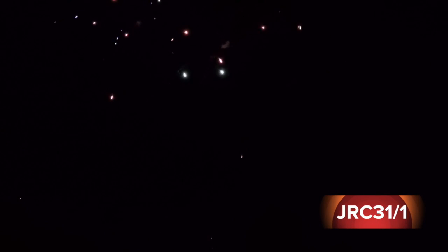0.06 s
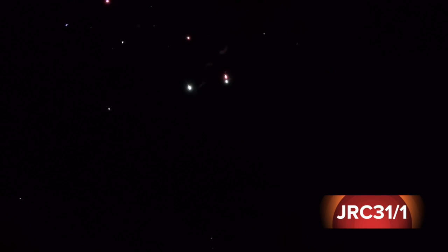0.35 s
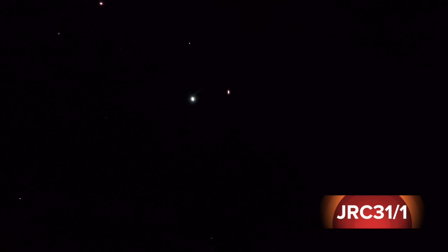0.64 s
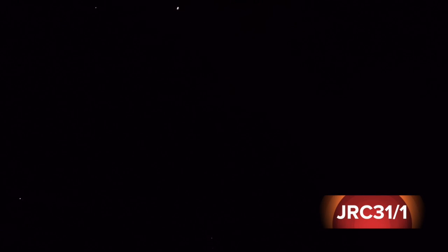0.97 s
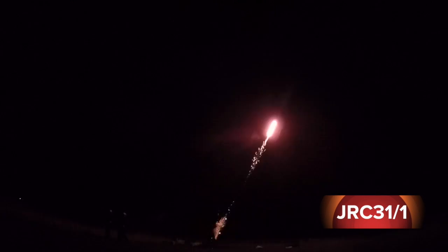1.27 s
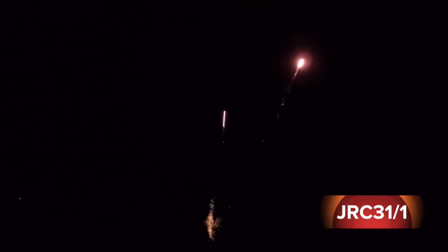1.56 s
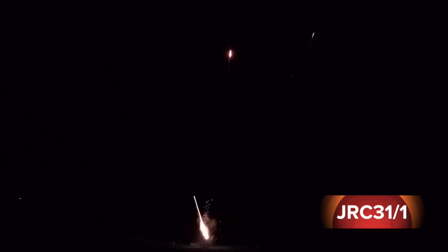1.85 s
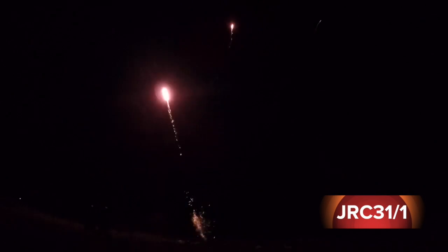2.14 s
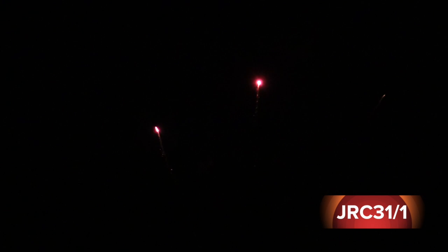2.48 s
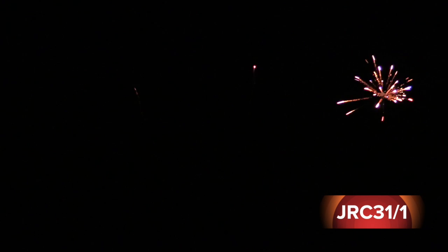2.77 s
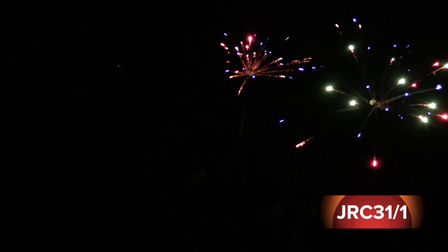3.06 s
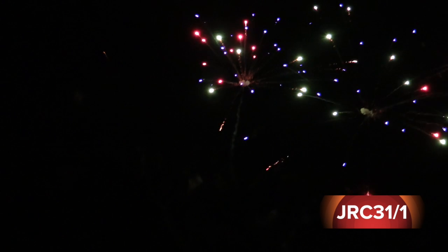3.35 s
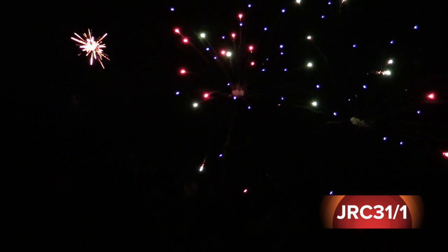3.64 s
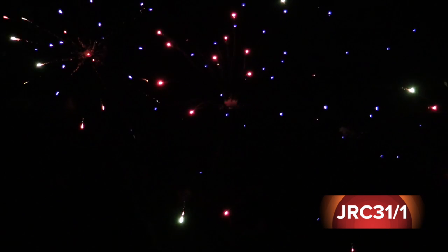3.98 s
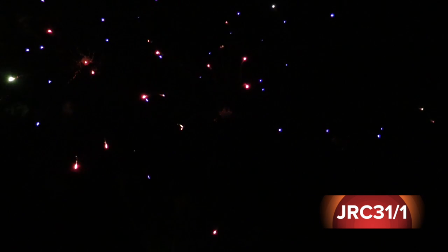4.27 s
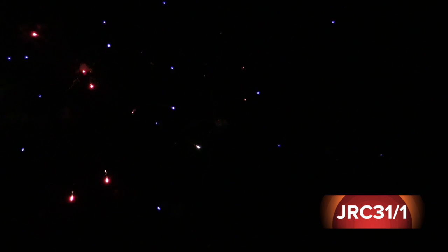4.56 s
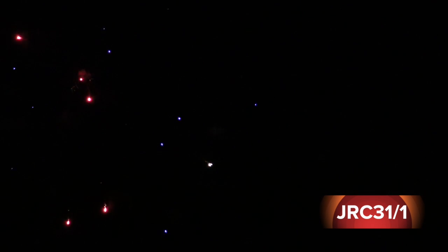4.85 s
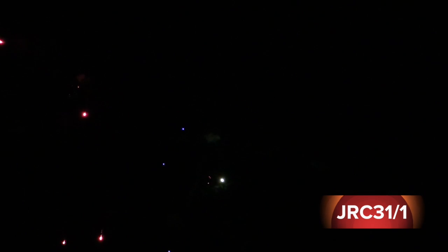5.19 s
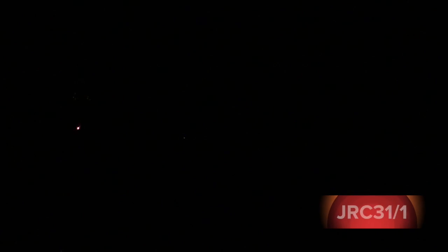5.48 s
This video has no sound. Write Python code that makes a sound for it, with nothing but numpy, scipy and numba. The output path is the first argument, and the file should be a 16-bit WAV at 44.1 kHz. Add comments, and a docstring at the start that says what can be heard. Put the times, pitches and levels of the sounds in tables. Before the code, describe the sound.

Fireworks at night: three thumping launches, then three loud bangs overhead that roll away in a fading, crackling rumble.

```python
"""A firework cake at night. First an earlier burst's rumble and crackle die away over the hiss of the
open air, with a few faint thuds and snaps. From 1.2 s three shells thump out of their tubes; walls slap
the sound back and trees crackle with echoes. From 3 s the shells burst overhead, overloading the
microphone. Last, their long rumble rolls round the land and fades, the air soaking up the treble."""
import sys
import numpy as np
from scipy import signal
from scipy.fft import rfft, irfft, next_fast_len
from scipy.io import wavfile
from scipy.ndimage import uniform_filter1d, map_coordinates
from numba import njit

SR = 44100
rng = np.random.default_rng(int(sys.argv[2]) if len(sys.argv) > 2 else 0)


def store_pcm(level_fs):
    """Save levels as 16-bit WAV."""
    pcm = np.round(np.clip(level_fs, -1, 1) * 32767).astype(np.int16)
    wavfile.write(sys.argv[1], SR, np.atleast_2d(pcm).T)


N = 247842
T = np.arange(N) / SR


def amp(db):
    """Turn decibels into a gain."""
    return 10 ** (np.asarray(db) / 20)


def add(track, s, sound):
    """Mix a sound into the track, starting at s seconds."""
    i = max(round(s * SR), 0)
    track[i:i + len(sound)] += sound[:max(N - i, 0)]


def filtered(x, response):
    """Turn each frequency of x up or down by response(hz)."""
    size = next_fast_len(N + 8192)
    return irfft(rfft(x, size) * response(np.fft.rfftfreq(size, 1 / SR)), size)[:N]


def coloured(x, spectrum, band=lambda hz: 1):
    """Give x the tone of a spectrum table, within a band, at an average (rms) level of 1."""
    f, db = np.transpose(spectrum)
    x = filtered(x, lambda hz: amp(np.interp(np.log(hz + 1), np.log(f), db)) * band(hz))
    return x / np.sqrt(np.mean(x ** 2) + 1e-20)


def bass(hz):
    """The long waves, below 600 Hz, that whole walls and slopes send back."""
    return 1 / np.sqrt(1 + (hz / 600) ** 8)


def treble(hz):
    """The short waves that twigs and rough ground send back."""
    return np.sqrt(1 - bass(hz) ** 2)


def steadied(x, span_s):
    """Even out x so that every stretch of span_s is equally loud."""
    return x / np.sqrt(np.abs(uniform_filter1d(x ** 2, int(span_s * SR))) + 1e-6)


def wobble(rate):
    """A smooth curve through random points, rate of them a second."""
    return map_coordinates(rng.standard_normal(int(N * rate / SR) + 4), [np.arange(N) * rate / SR])


def fading(age, db_per_s):
    """Full level until age 0, then a steady fall."""
    return amp(-db_per_s * np.maximum(age, 0))


def swelling(rows):
    """A gain with one smooth hump or dip for each row."""
    return amp(sum(db * np.exp(-.5 * ((T - s) / spread) ** 2) for s, spread, db in rows))


def echo_level(age, rise_s, hold_s, fall_db_per_s, far_db, far_db_per_s):
    """Echoes build up, hold while the near land answers, then leave the far hills' slow tail."""
    near = fading(age - hold_s, fall_db_per_s)
    far = amp(far_db) * fading(age - hold_s, far_db_per_s)
    return np.clip(age / rise_s, 0, 1) * np.hypot(near, far)


def rumbling(spectrum, lumps_db, rate):
    """Deep noise that comes in lumps, rate a second."""
    noise = coloured(rng.standard_normal(N), spectrum, bass)
    return steadied(noise, span_s=.12) * amp(lumps_db * wobble(rate))


def reflections(rate, clump_db):
    """Countless small echoes of random size, rate a second, arriving in clumps."""
    arrivals = rng.random(N) < rate / SR
    return arrivals * rng.standard_normal(N) * amp(clump_db * wobble(130))


def through_air(x, age, db_per_s, power):
    """Air takes db_per_s from an echo at 1 kHz, and more from the treble; an age below 0 brightens."""
    hz, t, spectra = signal.stft(x, SR, nperseg=256)
    loss_db = db_per_s * (hz[:, None] / 1000) ** power * np.interp(t, T, age)
    return signal.istft(spectra * amp(-loss_db), SR, nperseg=256)[1][:N]


def slaps(rows, rough, smear_s):
    """Short pulses, each in its own band of frequencies; rough surfaces smear their treble."""
    out, t = np.zeros(N), np.arange(SR // 10) / SR
    highpass = signal.butter(2, 1000, "high", fs=SR, output="sos")
    for s, db, hz, octaves in rows:
        edges = np.clip(hz * 2 ** (np.array([-.5, .5]) * octaves), 20, SR / 2 - 100)
        band = signal.butter(3, edges, "band", fs=SR, output="sos")
        pulse = signal.sosfilt(band, signal.unit_impulse(len(t)))
        smear = signal.sosfilt(highpass, rng.standard_normal(len(t)) * np.exp(-t / smear_s))
        smear = signal.sosfilt(band, smear / np.linalg.norm(smear))
        add(out, s, amp(db) * (pulse + rough * smear) / np.abs(pulse).max())
    return out


def blast(push_s, low_hz, front_hz, order):
    """A sudden push of air, then suction; the air rounds it and the microphone's bass cut rings."""
    u = np.arange(SR // 20) / SR / push_s
    shock = (1 - u) * np.exp(-u)
    air = signal.butter(1, front_hz, fs=SR, output="sos")
    microphone = signal.butter(order, low_hz, "high", fs=SR, output="sos")
    return -signal.sosfilt(microphone, signal.sosfilt(air, shock))


# the rumble's tone at first (off small things close by), at full depth, and from far hills: f/Hz, level/dB
EARLY_RUMBLE = [(25, -40), (80, -26), (150, -13), (240, -2), (330, 0), (440, -6), (600, -13), (900, -13)]
DEEP_RUMBLE = [(25, -36), (55, -41), (100, -13.5), (150, -4), (210, -1), (280, 1), (340, -3.5), (420, -9.5),
               (520, -18.5), (900, -13)]
FAR_RUMBLE = [(25, -48), (60, -30), (100, -10), (150, -1), (210, 1), (280, -2), (400, -9), (520, -14),
              (900, -18)]


def burst_rumble(age, hold_s, deepen_s=.27, far_db=-23.2):
    """A burst's low echoes deepen and die away, leaving a long tail from the far hills."""
    depth = np.clip(age / deepen_s, 0, 1) ** 2
    near = np.sqrt(1 - depth) * rumbling(EARLY_RUMBLE, lumps_db=.8, rate=35)
    near += np.sqrt(depth) * rumbling(DEEP_RUMBLE, lumps_db=.8, rate=35)
    near *= np.clip(age / .065, 0, 1) * fading(age - hold_s, db_per_s=63)
    far = amp(far_db) * rumbling(FAR_RUMBLE, lumps_db=1.6, rate=25)
    far *= np.clip(age / hold_s, 0, 1) * fading(age - hold_s, db_per_s=6.5)
    return near + far


# the tone of a burst's crackle: f/Hz, level/dB
BURST_CRACKLE = [(260, -41), (450, 1), (625, -14), (882, -8.5), (1070, -11), (1220, -12.5), (1440, -11),
                 (2330, -13.5), (4230, -18.5), (6060, -27), (7470, -29), (12400, -49), (16000, -57)]
# swells and lulls as the sound sweeps over nearby trees and clearings: t/s, spread/s, level/dB
SWELLS = [(3.1, .027, 6), (3.258, .018, 5), (3.992, .009, 9), (4.028, .006, 6.5), (4.058, .012, -4),
          (4.123, .022, 5.5), (4.215, .014, -4)]


def burst_crackle(age, hold_s, patchy_db=.7):
    """Tiny echoes off twigs and rough ground; later ones have crossed more air and sound duller."""
    crackle = coloured(reflections(rate=9000, clump_db=1.0), BURST_CRACKLE, treble)
    crackle = through_air(crackle, np.clip(age - .19, -.06, .7), db_per_s=.45, power=2.03)
    level = echo_level(age, rise_s=.01, hold_s=hold_s, fall_db_per_s=41, far_db=-23.5, far_db_per_s=7)
    return steadied(crackle, span_s=.052) * level * amp(patchy_db * wobble(35)) * swelling(SWELLS)


# shells bursting in the sky, the first before the start:
# t/s, blast level/dB, rumble level/dB, crackle level/dB, echo hold/s
BURSTS = [(-.83, 30, -7, -19, .44), (2.966, 30.5, -10.3, -20.2, .44), (3.1352, 31.5, -10.3, -19.6, .42),
          (3.9302, 33, -8.8, -20.8, .41)]


def rolls():
    """Every burst rolls round the land as a low rumble and a high crackle."""
    out = np.zeros(N)
    for s, _, rumble_db, crackle_db, hold_s in BURSTS:
        out += amp(rumble_db) * burst_rumble(T - s, hold_s)
        out += amp(crackle_db) * burst_crackle(T - s, hold_s)
    return out


# the tone of the night air: f/Hz, level/dB
NIGHT_HISS = [(30, -8), (90, 16.5), (220, -9.5), (500, 0.5), (1500, 0.5), (2500, -29), (3300, -7.5),
              (5000, -11.5), (7500, -15.5), (10000, -21.5), (13000, -26.5), (16000, -37)]


def night(air_db=-51, stars_db=-26.5, spread_s=.85):
    """The open air hisses faintly, and more as each burst's burning stars spread, until they fade."""
    power = amp(air_db) ** 2
    for s, _, _, crackle_db, _ in BURSTS:
        stars = np.clip((T - s) / spread_s, 0, 1) * fading(T - s - spread_s, db_per_s=12)
        power = power + (amp(crackle_db + stars_db) * stars) ** 2
    return np.sqrt(power) * coloured(rng.standard_normal(N), NIGHT_HISS)


# single echoes of the bursts: t/s, level/dB, f/Hz, width/octaves
THUDS = [(.048, -18, 190, 1.2), (.598, -25, 190, 1.2), (3.038, -4, 300, 1.2), (3.124, -2, 260, 1.3),
         (3.558, -4, 244, 1.2), (3.662, -8, 230, 1.2), (3.9895, 2, 1300, 3), (4.037, 0, 280, 1.2),
         (4.258, -6, 1100, 1.6), (4.362, -3.5, 400, 3), (4.521, -2, 230, 1.2), (4.812, -17, 260, 1.5),
         (4.842, -19, 222, 1.5), (5.406, -24, 220, 1.2)]


def thuds():
    """Far walls and slopes each send a burst back as one thud or slap."""
    return slaps(THUDS, rough=.4, smear_s=.0015)


# small sounds before the launches: t/s, level/dB, f/Hz, width/octaves
SNAPS = [(.3988, -14.5, 2800, 4), (.533, -39, 4350, .4), (.569, -33, 4300, .6), (.6045, -33, 4100, .7),
         (1.084, -31, 910, 1), (1.2115, -33, 1580, 0.64)]


def snaps():
    """Small snaps and far pops, one short pulse each."""
    return slaps(SNAPS, rough=.5, smear_s=.002)


# shells leaving their tubes: t/s, level/dB
LAUNCHES = [(1.242, 12), (1.539, 13.5), (2.019, 12)]
# echoes after each launch: t/s, level/dB, f/Hz, width/octaves
LAUNCH_ECHOES = [(.0003, 8.5, 2150, 1.35), (.0036, 0, 2220, 1.1), (.004, -13, 7400, .5),
                 (.0104, -15, 2400, 1.7), (.0187, 4, 2900, 1.4), (.0202, -7, 2600, 1.1),
                 (.021, -12.5, 380, 1.5), (.06, -11.5, 295, 1.05), (.07, -14, 330, 1.8),
                 (.0845, -4, 262, 1.17), (.133, -12, 1940, 1.05), (.1735, -9.5, 1800, .8),
                 (.2355, -15, 3040, 1.06), (.244, -17.5, 1600, .76), (.36, -21, 213, .6)]
# the tone of a launch's rumble and of its crackle: f/Hz, level/dB
LAUNCH_RUMBLE = [(15, -72), (25, -46), (64, -37), (78, -33), (91, -13), (204, 2), (350, -2.5), (502, -22),
                 (549, -13), (900, -36), (1170, -49), (1980, -120)]
LAUNCH_CRACKLE = [(260, -30), (450, 3.5), (546, -13), (598, -8.5), (705, -13), (964, -15), (1630, -9),
                  (1950, -11), (2470, -12.5), (4050, -17), (5460, -22.5), (7360, -27), (10200, -38),
                  (16000, -56)]
# groups of trees that throw the crackle back after each launch: t/s, spread/s, level/dB
GROVES = [(.052, .012, 3), (.137, .016, 5), (.24, .012, 1.5), (.375, .022, 6.5), (.49, .035, 5.5)]


def launches(rumble_db=-20.3, crackle_db=-25.7):
    """Each shell thumps out; the tubes stand together, so all share one rumble but the crackle varies."""
    rumble = steadied(coloured(rng.standard_normal(N), LAUNCH_RUMBLE, bass), span_s=.04)
    rumble *= echo_level(T, rise_s=.045, hold_s=.075, fall_db_per_s=42, far_db=-21, far_db_per_s=12)
    crackle_level = echo_level(T, rise_s=.003, hold_s=.04, fall_db_per_s=39, far_db=-13, far_db_per_s=16)
    crackle_level *= swelling(GROVES)
    out = np.zeros(N)
    for s, db in LAUNCHES:
        crackle = coloured(reflections(rate=9000, clump_db=1.1), LAUNCH_CRACKLE, treble)
        crackle = through_air(crackle, np.minimum(T, .6) - .1, db_per_s=1.1, power=1.61)
        crackle = steadied(crackle, span_s=.035) * crackle_level
        add(out, s, amp(db) * blast(push_s=.0062, low_hz=181, front_hz=5800, order=4))
        add(out, s, slaps(LAUNCH_ECHOES, rough=.46, smear_s=.00067))
        add(out, s, amp(rumble_db) * rumble + amp(crackle_db) * crackle)
    return out


# echoes after each burst, the ground's bounce first: t/s, level/dB, f/Hz, width/octaves
BURST_ECHOES = [(.007, -6, 1500, 3), (.0078, 10, 315, 1.12), (.108, -1.5, 278, 1.33), (.29, -9, 1290, 2.7),
                (.432, -7.5, 1000, 2.5)]


def bursts():
    """Each burst sends one hard shock, followed by the ground's bounce and dull far slaps."""
    out = np.zeros(N)
    for s, db, *_ in BURSTS:
        if s > 0:
            add(out, s, amp(db) * blast(push_s=.0027, low_hz=253, front_hz=5000, order=3))
            add(out, s, slaps(BURST_ECHOES, rough=.58, smear_s=.0011))
    return out


def scene():
    """Everything that reaches the one microphone."""
    return (launches() + bursts() + thuds() + rolls() + snaps() + night())[None]


@njit
def limiter_cut(over_db, attack, release):
    """How many dB the limiter turns the sound down: it chases an overload fast and lets go slowly."""
    cut, out = 0.0, np.zeros(len(over_db))
    for i in range(len(over_db)):
        cut += (over_db[i] - cut) * (attack if over_db[i] > cut else release)
        out[i] = cut
    return out


def record(dry, ceiling_db=-1, attack_s=.0019, release_s=.043, lag_s=.0075, hardness=6):
    """A limiter turns each shock down, too late to stop its front clipping; the top treble is lost."""
    over_db = np.maximum(20 * np.log10(np.abs(dry[0]) + 1e-9) - ceiling_db, 0)
    cut_db = limiter_cut(over_db, 1 / (attack_s * SR), 1 / (release_s * SR))
    x = dry[0] * amp(-np.interp(T - lag_s, T, cut_db))
    x = .97 * x / (1 + np.abs(x) ** hardness) ** (1 / hardness)  # clipping flattens the peaks
    x = filtered(x, lambda hz: 1 / np.sqrt(1 + (hz / 14200) ** 4))  # soften the highest treble
    return filtered(x, lambda hz: np.clip((16600 - hz) / 600, 0, 1))[None]  # nothing above 16.6 kHz


dry = scene()
out = record(dry)
store_pcm(out)
```